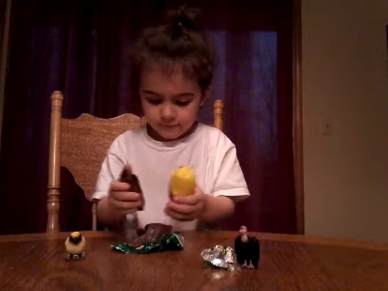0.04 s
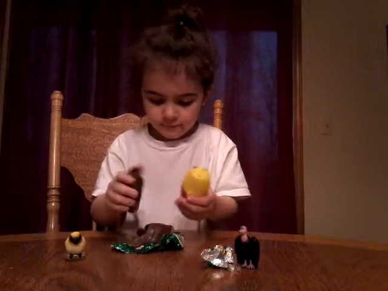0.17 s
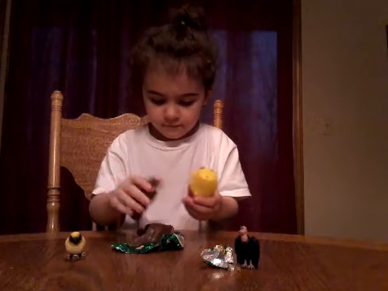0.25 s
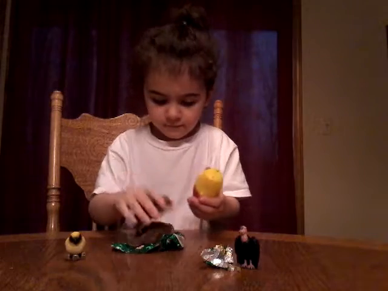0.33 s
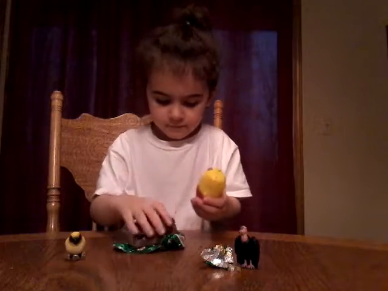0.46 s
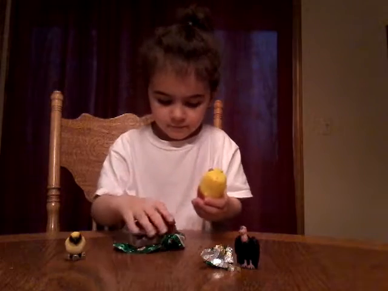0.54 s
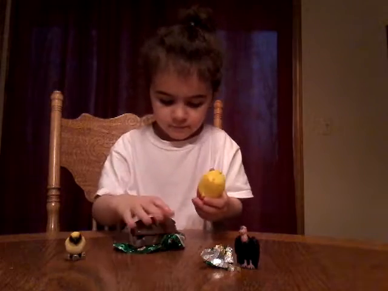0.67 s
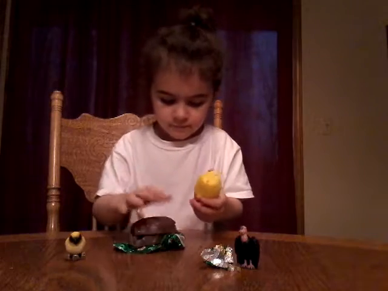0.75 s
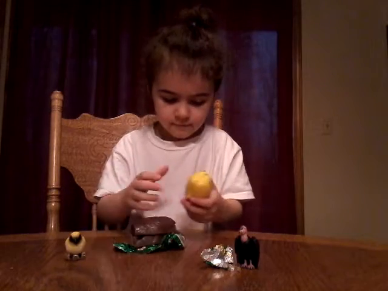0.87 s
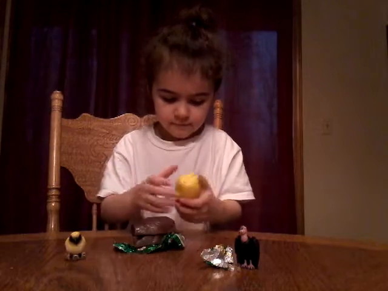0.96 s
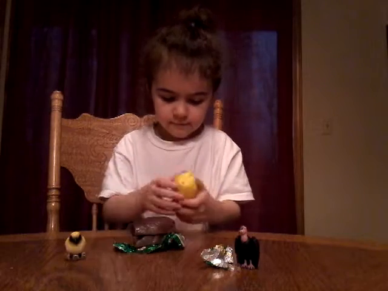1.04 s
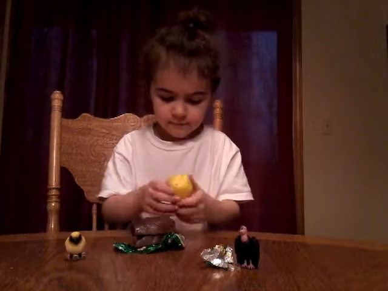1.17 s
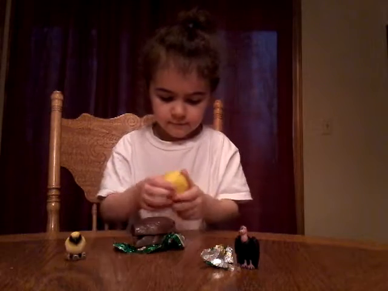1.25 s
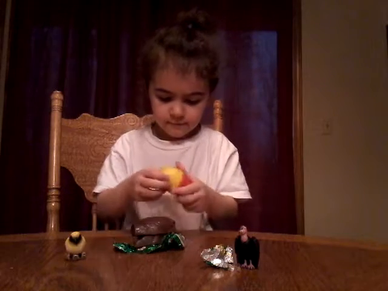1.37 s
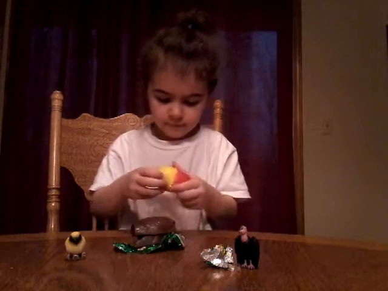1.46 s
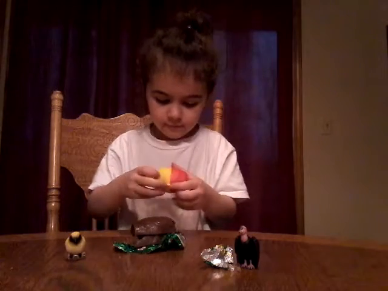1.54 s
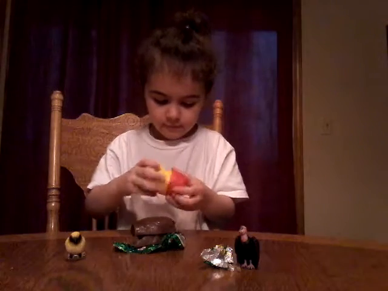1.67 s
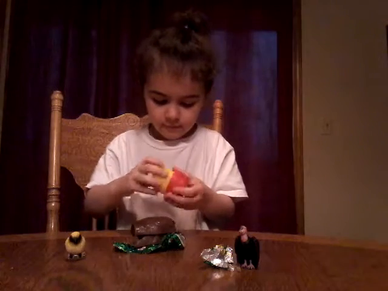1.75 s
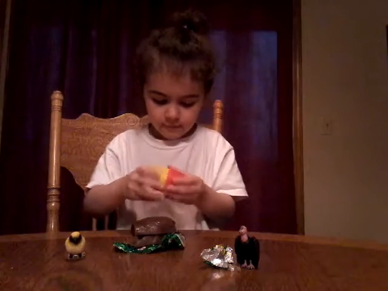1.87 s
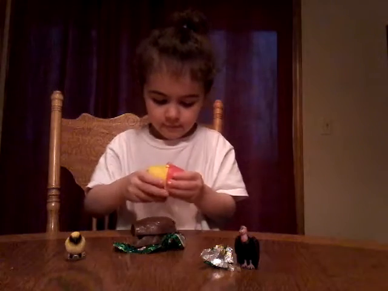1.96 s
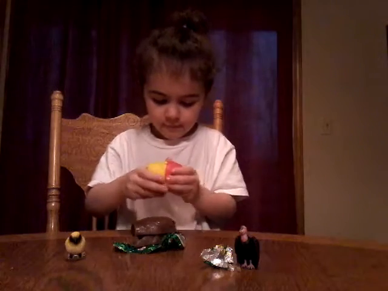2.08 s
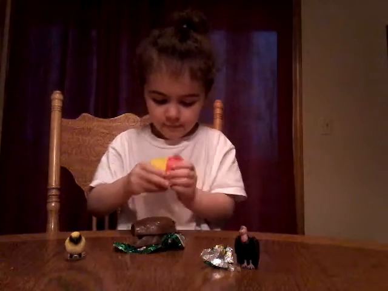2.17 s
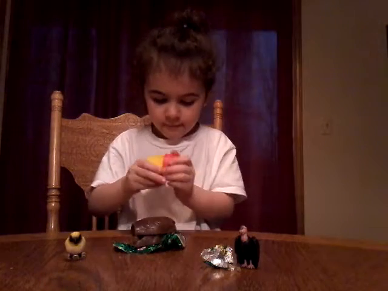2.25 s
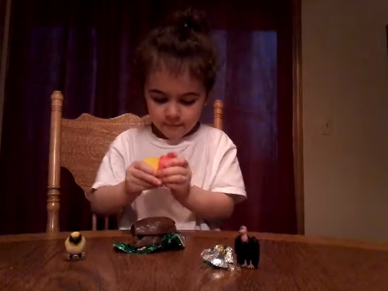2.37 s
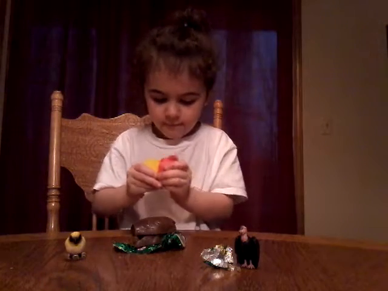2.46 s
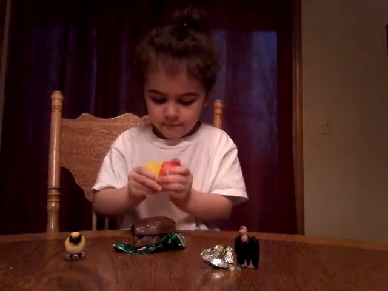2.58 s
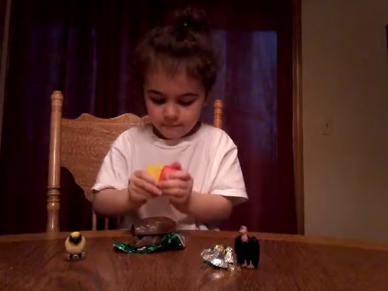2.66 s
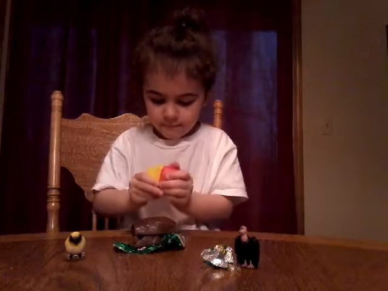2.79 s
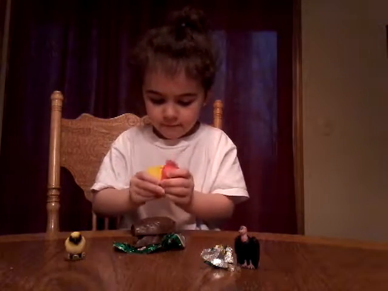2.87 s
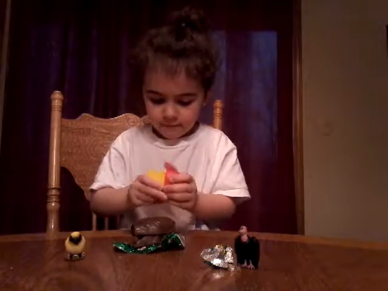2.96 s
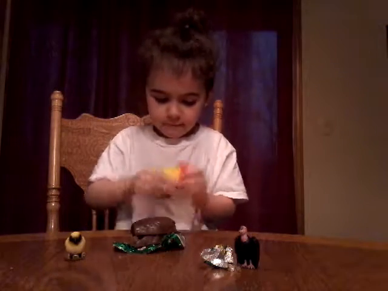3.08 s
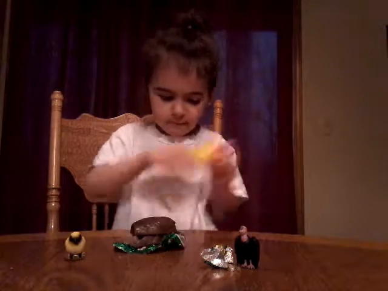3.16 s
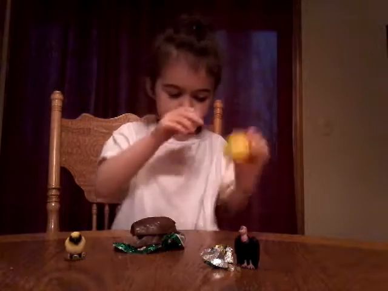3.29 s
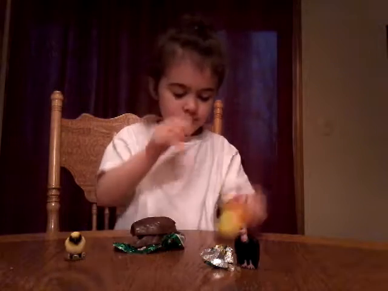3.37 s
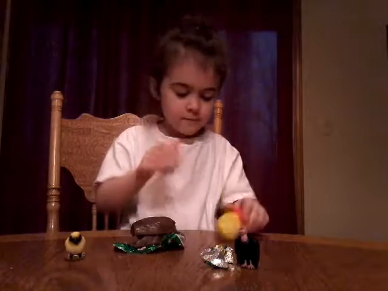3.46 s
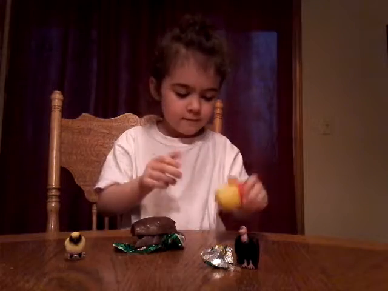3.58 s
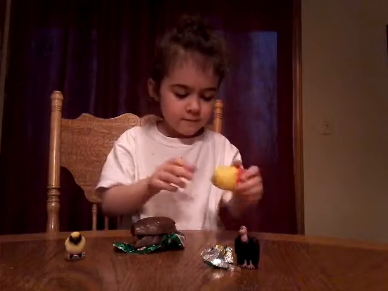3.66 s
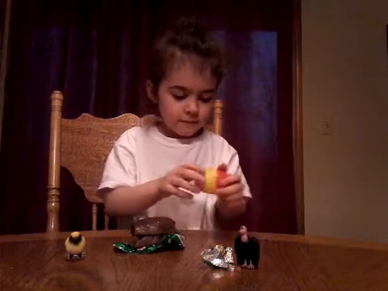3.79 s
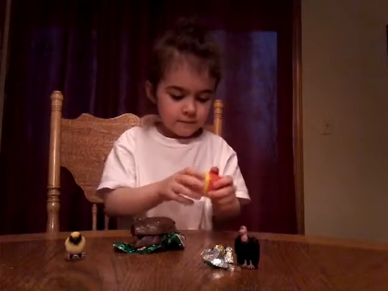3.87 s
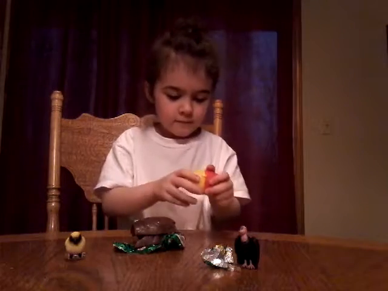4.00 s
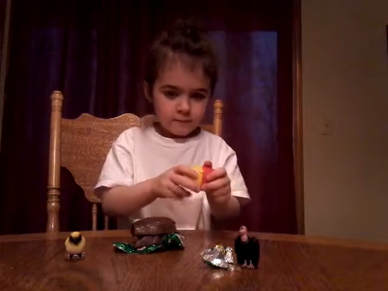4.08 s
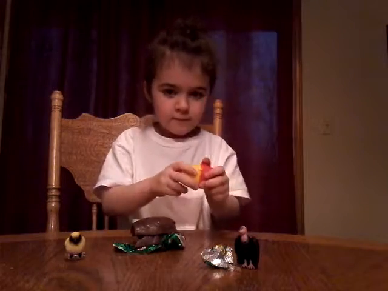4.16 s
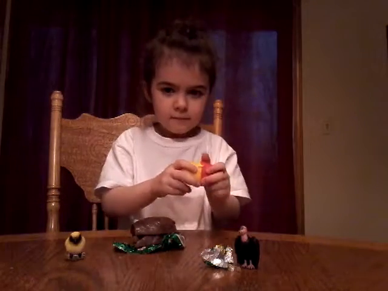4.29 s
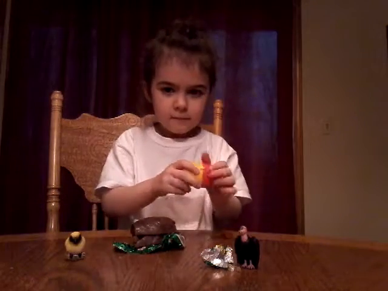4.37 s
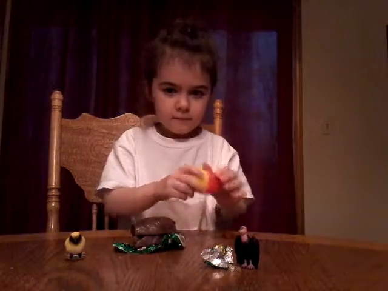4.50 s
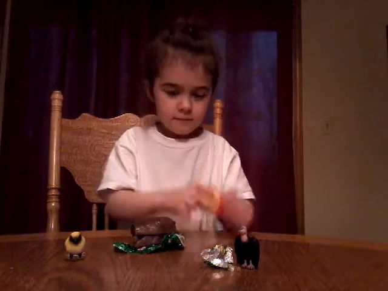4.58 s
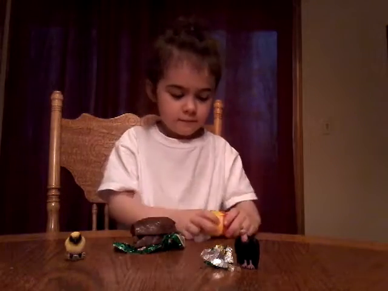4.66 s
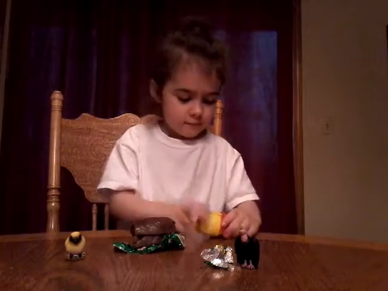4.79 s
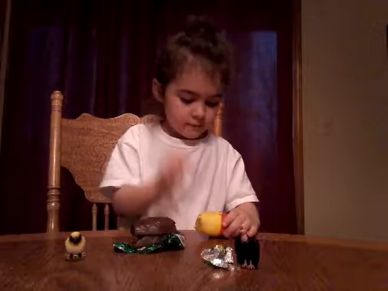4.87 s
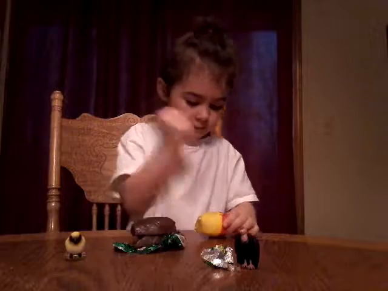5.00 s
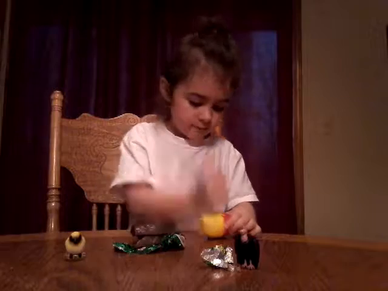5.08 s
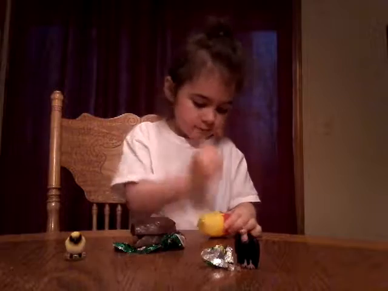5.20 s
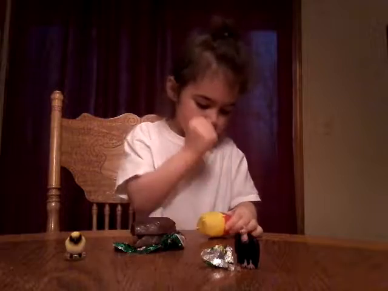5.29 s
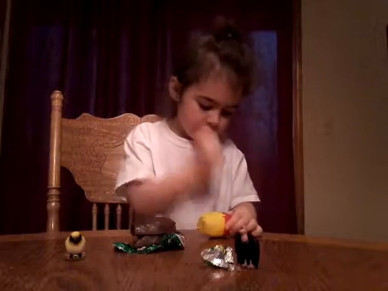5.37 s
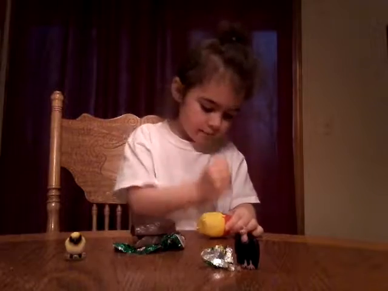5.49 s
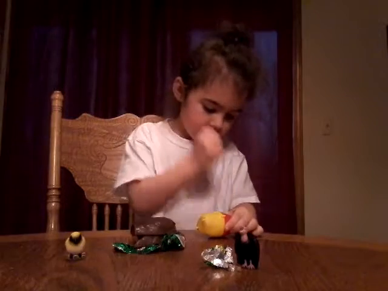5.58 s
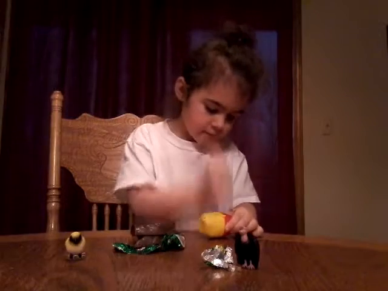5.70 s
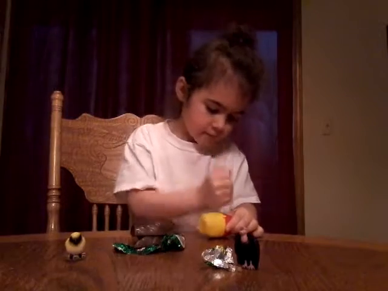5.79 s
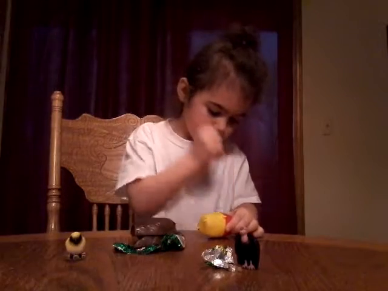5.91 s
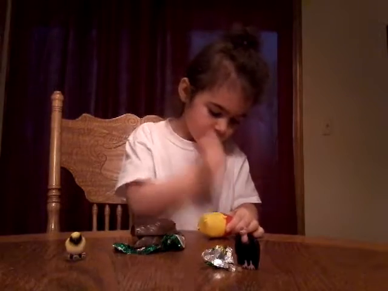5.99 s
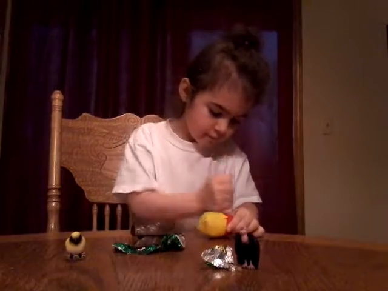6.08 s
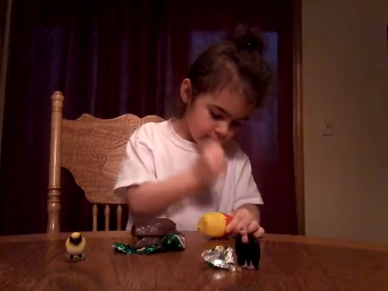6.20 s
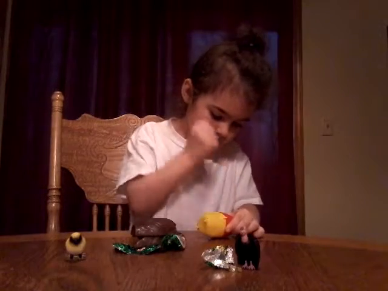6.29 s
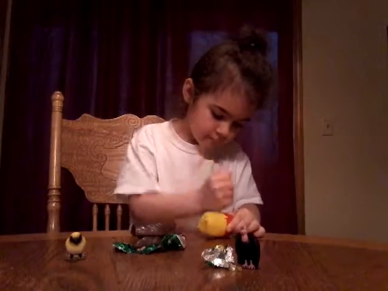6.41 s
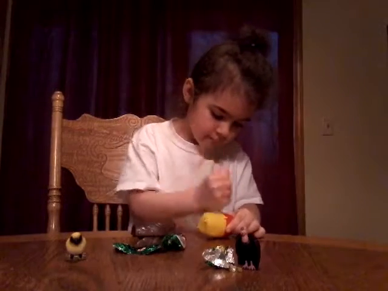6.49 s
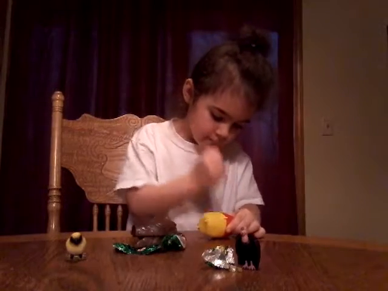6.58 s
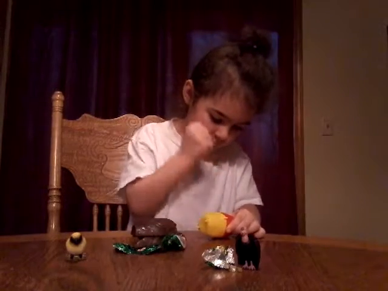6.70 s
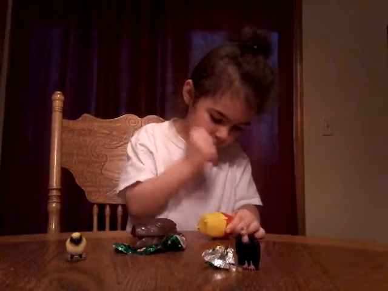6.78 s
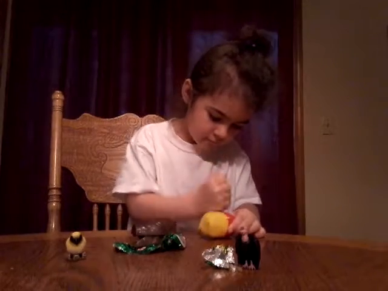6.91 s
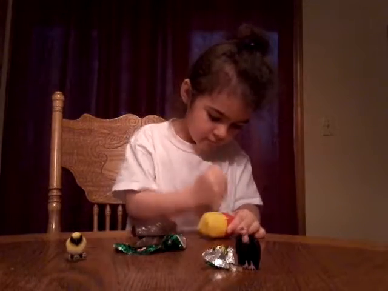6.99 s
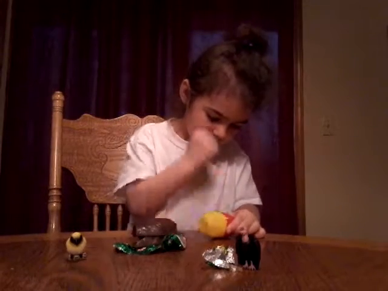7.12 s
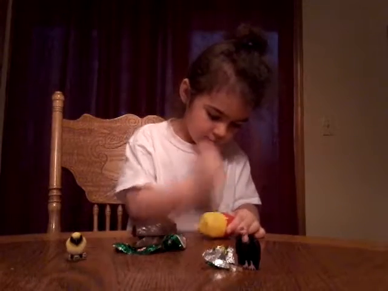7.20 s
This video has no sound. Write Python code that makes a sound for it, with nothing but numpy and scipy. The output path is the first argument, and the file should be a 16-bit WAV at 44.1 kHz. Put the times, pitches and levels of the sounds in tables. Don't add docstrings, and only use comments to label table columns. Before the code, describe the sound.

A close small microphone at a wooden table in an echoing dining room, with low rumble, soft hiss and a steady, thin, very high electronic whine. From 0 to 3 s fingers faintly stroke a hollow plastic capsule; light taps and nail clicks cluster around 0.4 to 0.6 s, with sparse tiny ticks afterwards. At about 3.45 s comes one loud, hard, hollow plastic knock on wood with a brief room tail. Quiet rubbing follows; near 4.7 s the capsule is laid down with a small clack, then a short scrape and clicks at 4.9 s. Fist blows land at about 5.15, 5.5, 5.8, 6.1, 6.45 and 6.95 s: skin slap, dull plastic pock, deep table boom and rocking legs, with loose toys lightly clattering after each. The first is sharp, the third has the loudest shell sound, the last is clearly weaker.

```python
import sys
import numpy as np
from scipy import signal
from scipy.fft import rfft, irfft
from scipy.io import wavfile
from scipy.ndimage import uniform_filter1d

SR = 44100
rng = np.random.default_rng(int(sys.argv[2]) if len(sys.argv) > 2 else 0)


def makeup_ratio(level_db):
    decades = np.asarray(level_db, float) / 20
    return 10 ** decades


def inscribe(sig):
    pcm = np.round(np.clip(np.atleast_2d(sig).T, -1, 1) * 32767)
    wavfile.write(sys.argv[1], SR, pcm.astype(np.int16))


N = 319725


def level(x, db):
    return x * makeup_ratio(db) / np.sqrt(np.mean(x ** 2))


def band(x, lo_hz, hi_hz, order=2):
    edges_hz = [lo_hz, min(hi_hz, 0.45 * SR)]
    return signal.sosfilt(signal.butter(order, edges_hz, "band", fs=SR, output="sos"), x)


def add(track, s, x):
    i = int(s * SR)
    track[i:i + len(x)] += x[:N - i]


def decay(t, t60):
    return np.exp(-np.log(1000) * t / t60)


def ring(modes, spread_db, detune, size):
    hz, db, t60 = np.transpose(modes)[:, :, None]
    t = np.arange(size) / SR
    share, shift = rng.standard_normal((2, len(modes), 1))
    sense = (-1) ** np.arange(len(modes))[:, None]
    gain = makeup_ratio(db + spread_db * share) * sense
    x = gain * np.sin(2 * np.pi * hz * (1 + detune * shift) * t) * decay(t, t60)
    return x.sum(axis=0) / np.sqrt(np.sum(makeup_ratio(2 * db)))


# [t/s, crack level/dB, rim level/dB, shell level/dB, table level/dB]
FIST_BLOWS = [
    (5.1646, -13, -36, -22.5, -18),
    (5.4899, -17, -54, -28, -16.5),
    (5.7939, -15, -17.5, -15.5, -17),
    (6.103, -19.5, -19.5, -17.5, -17.5),
    (6.4578, -20.5, -26.5, -21.5, -17.5),
    (6.9345, -29.5, -34, -27, -24.5),
]
# [f/Hz, level/dB, t60/s]
TABLE_MODES = [(64.4, -9, 0.38), (99.6, 1, 0.18), (118, -10, 0.046), (162.1, -8.5, 0.12),
               (200, -10.5, 0.095), (242, -1.5, .13), (295.8, -3.5, .15), (337, -6.5, 0.19),
               (377, -11, 0.3), (425.4, -6, 0.2), (469, 1.5, 0.043), (567, -22, 0.15), (598, 2, 0.083),
               (727, -35, 0.017)]
# [delay/s, push into the top/dB, leg thump level/dB, thump f/Hz, thump swell/s]
TABLE_ROCKS = [
    (.001, -7.5, -6.5, 200, 0.0026),
    (.0105, -7, 3, 102.2, 0.0059),
    (.032, -16.5, 6, 140.3, 0.005),
    (.058, -11.5, -6, 170, .004),
    (.094, -17, -6.5, 110.5, 0.0067),
]


def fists():
    out = np.zeros(N)
    push = np.hanning(int(0.002 * SR))
    t = np.arange(4000) / SR
    for s, crack_db, rim_db, shell_db, table_db in FIST_BLOWS:
        add(out, s - 0.008, contact(crack_db, rim_db, shell_db, rise_s=0.0016, fall_s=0.0033))
        rock_back_db = -4.5 - 0.75 * (table_db + 18)
        for k, (delay, push_db, leg_db, leg_hz, swell_s) in enumerate(TABLE_ROCKS):
            db = table_db + (k >= 2) * rock_back_db
            top = np.convolve(ring(TABLE_MODES, 3.5, 0.035, size=20000), push / push.sum())
            add(out, s + delay, -makeup_ratio(db + push_db + 5) * top)
            swell = t / swell_s * np.exp(-t / swell_s)
            thump = swell * np.sin(2 * np.pi * leg_hz * t)
            add(out, s + delay, -makeup_ratio(db + leg_db + 9.5) * thump)
    return out


# [t/s, crack level/dB, shell level/dB, board level/dB, weight level/dB]
TABLE_KNOCKS = [
    (0.381, -44, -42.5, -39, -48.5),
    (0.484, -49, -46, -48, -69),
    (0.5151, -40, -37.5, -40, -48.5),
    (3.4406, -31.5, -37.5, -46, -55),
    (3.4545, -11.5, -8, -23, -32.5),
    (4.6988, -44, -53.5, -42.5, -39.5),
    (4.7322, -31.5, -40, -32, -42.5),
    (4.7435, -54, -51, -40, -52),
]
# [f/Hz, level/dB, t60/s]
BOARD_MODES = [(176, 8, 0.034), (225, -3.5, 0.078), (275, 1, 0.15), (309, 4.5, 0.074), (343, 3, 0.077),
               (397.6, -0.5, 0.087), (469, 0, 0.088), (460, -6.5, 0.12)]


def knocks():
    out = np.zeros(N)
    for s, crack_db, shell_db, board_db, weight_db in TABLE_KNOCKS:
        rim_db = (crack_db + shell_db) / 2 - 9.5
        hit = contact(crack_db, rim_db, shell_db, rise_s=0.00013, fall_s=0.0034, free=True)
        add(out, s - 0.008, hit)
        add(out, s + 0.001, makeup_ratio(board_db + 6) * ring(BOARD_MODES, 2, 0.02, size=12000))
        add(out, s + 0.004, makeup_ratio(weight_db + 3) * ring(TABLE_MODES[:4], 2, 0.03, size=20000))
    return out


# [f/Hz, level/dB, t60/s]
SHELL_MODES = [(400, -8, .025), (480, -6, .025), (549, -3, .03), (660, -4, .025), (745, -1, .025),
               (872, -1.5, .025), (980, -3, .02), (1100, -2.5, .02), (1200, -1.5, .025), (1390, -3, .022),
               (1575, -5, .018), (1800, -8.5, .015), (2100, -11, .012), (2400, -16, .01)]


def contact(crack_db, rim_db, shell_db, rise_s, fall_s, free=False):
    t = np.arange(2048) / SR - 0.008
    hits = rng.standard_normal(len(t)) * makeup_ratio(4 * rng.exponential(size=len(t)))
    hits[int(0.008 * SR)] = 5 * np.sqrt(np.mean(hits ** 2))
    swell = np.where(t < 0, np.exp(t / rise_s), np.exp(-t / fall_s))
    z = rfft(swell * hits)
    even = z / np.sqrt(uniform_filter1d(np.abs(z) ** 2, size=15))
    x = irfft(even) * (t > -4 * rise_s)
    if free:
        shell = makeup_ratio(8) * np.convolve(x, ring(SHELL_MODES, 1.5, 0.012, size=2048))[:len(x)]
    else:
        shell = makeup_ratio(32) * band(x, 420, 1500)
    crack = makeup_ratio(crack_db + 13) * band(x, 3100, 6300) - makeup_ratio(crack_db - 1.7) * band(x, 7300, 15500)
    rim = makeup_ratio(rim_db + 21) * band(x, 1600, 3600, order=3)
    return makeup_ratio(shell_db) * shell + crack - rim


# [t/s, level/dB, brightness/dB]
TOY_HOPS = [(5.171, -27, -8), (5.222, -31.5, 2.5), (5.269, -38, 2), (5.4975, -31, 6), (5.504, -21, -3),
            (5.5492, -40, 9.5), (5.6073, -42, -6), (5.8062, -44, 13.5), (5.8556, -29.5, -21),
            (5.905, -51, 15.5), (6.1195, -42, 15), (6.1659, -29, -1), (6.2112, -48, 11), (6.4695, -30, 9),
            (6.5282, -28.5, 1.5), (6.574, -43, -12.5), (6.9427, -35, 10.5), (6.983, -48, 11),
            (7.003, -30.5, 1), (7.0456, -56.5, 18.5)]


def hops():
    out = np.zeros(N)
    for s, db, bright_db in TOY_HOPS:
        add(out, s - 0.008, tap(db + bright_db, db + 1, db))
    return out


# [t/s, crack level/dB, rim level/dB, shell level/dB]
NAIL_TICKS = [(0.453, -41, -51, -65), (0.4622, -42, -50, -51), (0.5288, -50, -46, -42.5),
              (0.637, -56, -40, -56), (1.0485, -61, -76, -76), (1.515, -45, -49, -69),
              (1.526, -73, -72, -57), (1.634, -58, -75, -63), (1.8476, -51, -75, -59.5),
              (2.2203, -53.5, -72, -70), (2.393, -37, -63, -73), (2.9288, -68.5, -71, -75),
              (3.3295, -41.5, -69, -50.5), (3.3344, -30.5, -72.5, -44), (3.4739, -40.5, -48.5, -20),
              (4.7093, -41, -65, -48), (4.8597, -43.5, -56, -55), (4.8769, -36.5, -54, -53)]


def ticks():
    out = np.zeros(N)
    for s, crack_db, rim_db, shell_db in NAIL_TICKS:
        add(out, s - 0.008, tap(crack_db, rim_db, shell_db))
    return out


def tap(crack_db, rim_db, shell_db):
    return contact(crack_db, rim_db, shell_db, rise_s=0.00012, fall_s=0.002)


# [peak t/s, level/dB, rise/s, fall/s, rim share/dB]
FINGER_STROKES = [(0.0, -55.5, 0.015, 0.043, -8.5), (0.399, -53, 0.0038, 0.038, -7),
                  (0.46, -45, 0.028, 0.036, -8.5), (0.528, -45.5, 0.019, 0.026, -6),
                  (0.56, -72, .02, 0.32, -15), (0.9, -68, .07, 0.1, -13), (1.05, -60, 0.01, .06, -20),
                  (1.27, -68, .03, .05, -18), (1.35, -57.5, .05, 0.12, -18),
                  (1.58, -60.5, 0.14, 0.12, -5.5), (1.74, -66.5, .08, 0.13, -10),
                  (1.845, -62, 0.0071, 0.11, -14), (2.16, -66, .02, .06, -18),
                  (2.238, -61.5, .03, 0.043, -11), (2.932, -59.5, .02, 0.029, -23),
                  (3.05, -63.5, 0.11, 0.27, -9), (3.79, -64, .1, 0.15, -5.5),
                  (4.162, -70.5, 0.041, 0.016, -18), (4.381, -55, 0.022, .07, -28),
                  (4.68, -59, .04, 0.026, -8), (4.74, -48, .01, 0.092, -17),
                  (4.875, -38, 0.016, 0.014, -13.5), (5.019, -54.5, 0.0083, .06, -12)]


def rubbing():
    t, out = np.arange(N) / SR, np.zeros(N)
    slips = rng.standard_normal(N) * makeup_ratio(2.5 * rng.exponential(size=N))
    hiss = level(band(slips, 5000, 8500), -16)
    rim = level(band(slips, 2300, 3800), -6)
    for s, db, rise_s, fall_s, rim_db in FINGER_STROKES:
        away = np.where(t < s, (s - t) / rise_s, (t - s) / fall_s)
        fade_db = 20 * np.minimum(away, 8)
        out += makeup_ratio(db - fade_db) * (hiss + makeup_ratio(rim_db) * rim)
    return out


# [f/Hz, t60/s, level/dB]
ROOM_ECHO = [(55.56, 0.57, -36), (108, 0.86, -50.5), (260.8, 0.46, -28.5), (514, 0.65, -29),
             (1004, 0.73, -29), (2030, 0.68, -26), (4200, 0.6, -25.5), (8350, 0.52, -21),
             (14610, 0.3, -41.5)]


def room(x):
    t = np.arange(40000) / SR
    build = 1 - np.exp(-t / 0.004)
    tail = np.zeros(len(t))
    for hz, t60, db in ROOM_ECHO:
        octave = band(rng.standard_normal(len(t)), hz / 2 ** 0.5, hz * 2 ** 0.5)
        tail += level(octave, db - 21.5) * decay(t, t60)
    return signal.fftconvolve(x, build * tail)[:N]


def microphone(x):
    resonance_hz, width_hz, low_hz, resonance_db = 6544, 654, 53, 13.5
    x = signal.sosfilt(signal.butter(4, low_hz, "high", fs=SR, output="sos"), x)
    peak = signal.lfilter(*signal.iirpeak(resonance_hz, resonance_hz / width_hz, fs=SR), x)
    return x + makeup_ratio(resonance_db) * peak


# [f/Hz, level per Hz/dB]
HUSH_SPECTRUM = [(25, -32), (60, -6.5), (135, -0.5), (200, -4.5), (400, -10.5), (1200, -18.5),
                 (2200, -21.5), (4000, -28.5), (6600, -27), (9000, -30.5), (13000, -26.5), (14000, -47.5),
                 (15500, -48)]


def hush():
    hz, db = np.transpose(HUSH_SPECTRUM)
    f = np.maximum(np.arange(N // 2 + 1) * SR / N, 1)
    colour = makeup_ratio(np.interp(np.log(f), np.log(hz), db))
    x = level(irfft(rfft(rng.standard_normal(N)) * colour, N), -67.5)
    steps = np.repeat(rng.standard_normal(N // 8000 + 1), 8000)[:N]
    swell_db = 0.83 * uniform_filter1d(steps, size=8000)
    return x + (makeup_ratio(swell_db) - 1) * band(x, 60, 370)


# [f/Hz, level/dB]
WHINE_LINES = [(4823, -93), (8382, -91), (13207, -55)]


def whine():
    t = np.arange(N) / SR
    drift = 1 - 1.5e-4 * np.cos(2 * np.pi * (t - 1.6) / 6.5)
    clock = np.cumsum(drift) / SR
    return sum(2 ** 0.5 * makeup_ratio(db) * np.sin(2 * np.pi * hz * clock) for hz, db in WHINE_LINES)


def scene():
    near = fists() + knocks() + hops() + ticks() + rubbing()
    return (microphone(near + room(near)) + hush() + whine())[None]


def top_cut(x):
    return signal.sosfilt(signal.butter(12, 16830, fs=SR, output="sos"), x)


def record(dry):
    mix = signal.sosfilt(signal.ellip(8, 0.2, 60, 15800, fs=SR, output="sos"), dry)
    return top_cut(mix)


dry = scene()
out = record(dry)
inscribe(out)
```